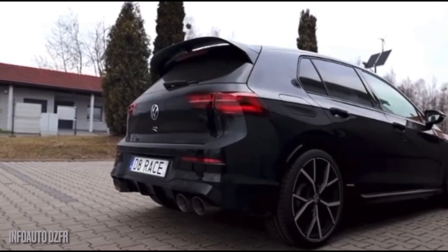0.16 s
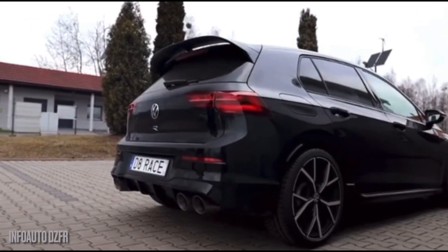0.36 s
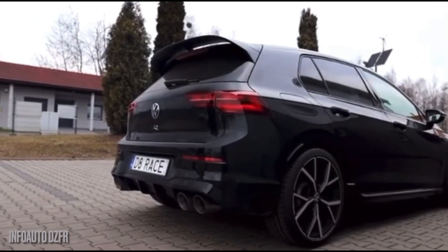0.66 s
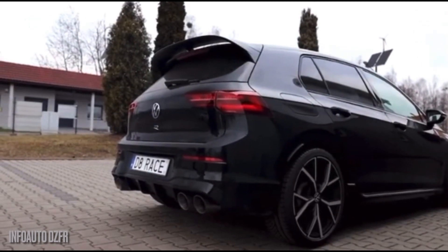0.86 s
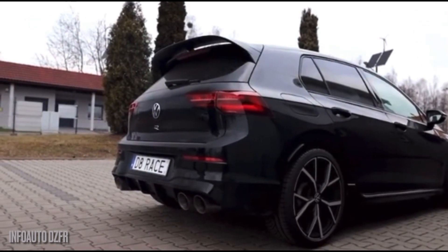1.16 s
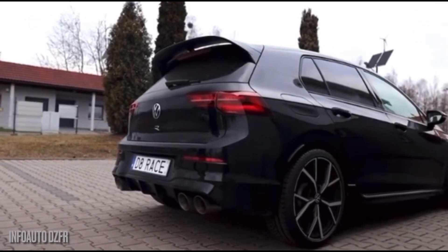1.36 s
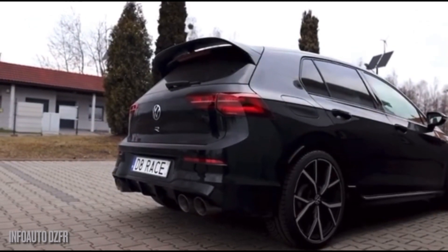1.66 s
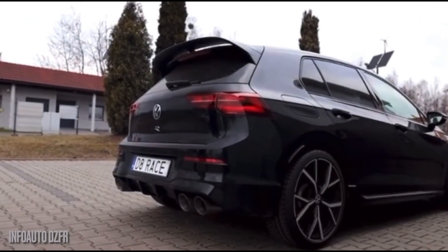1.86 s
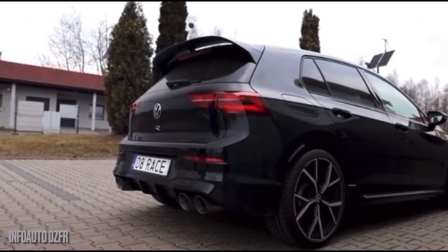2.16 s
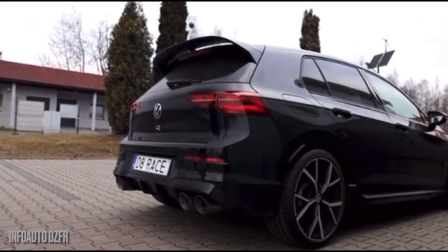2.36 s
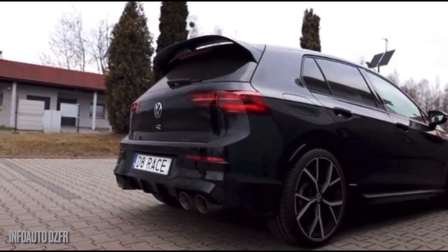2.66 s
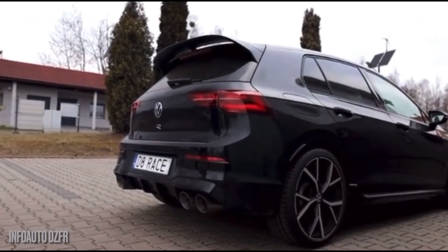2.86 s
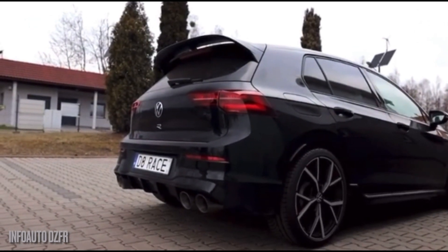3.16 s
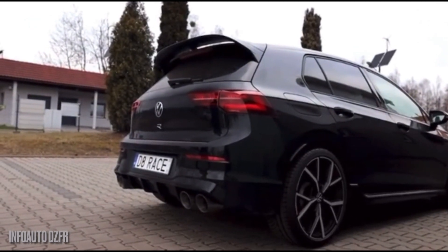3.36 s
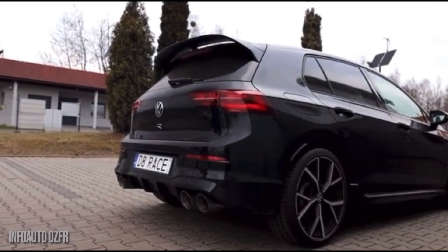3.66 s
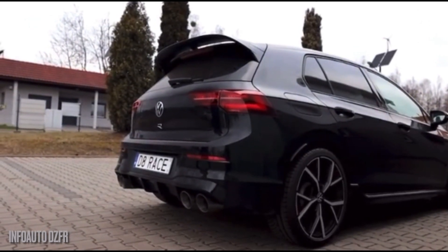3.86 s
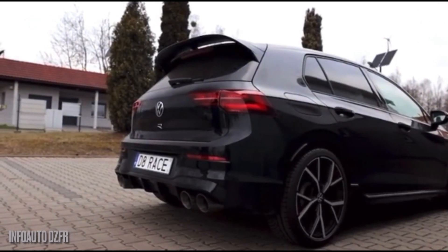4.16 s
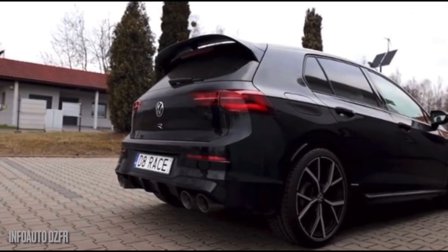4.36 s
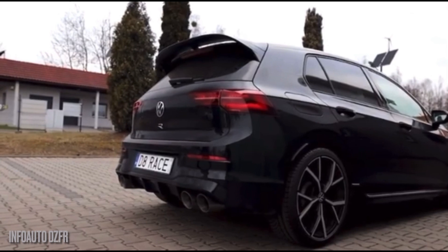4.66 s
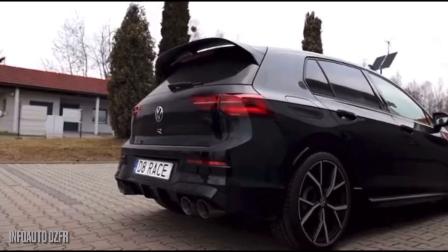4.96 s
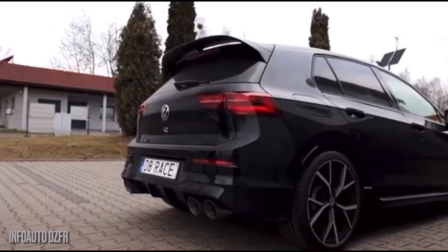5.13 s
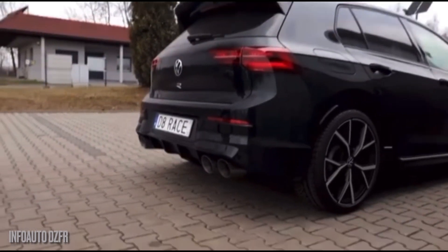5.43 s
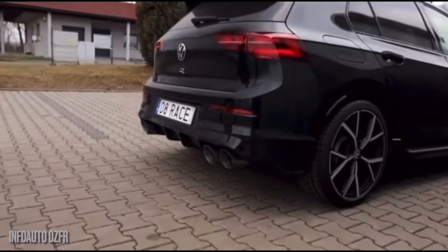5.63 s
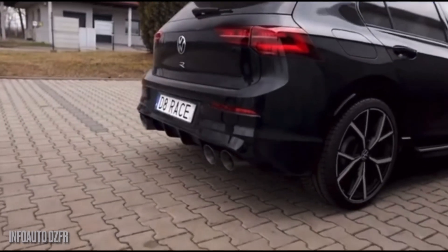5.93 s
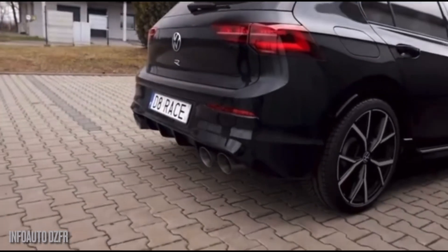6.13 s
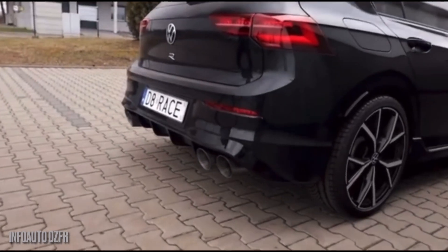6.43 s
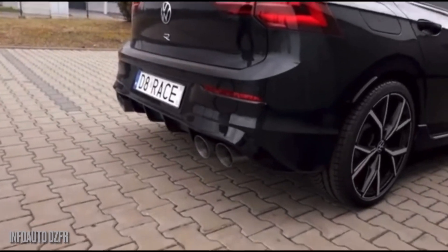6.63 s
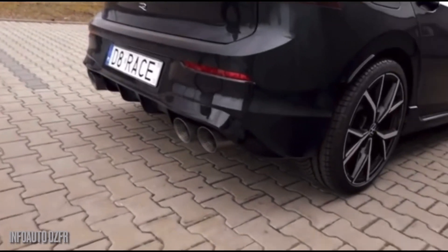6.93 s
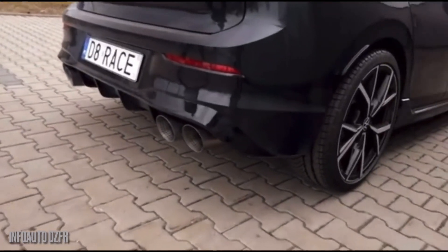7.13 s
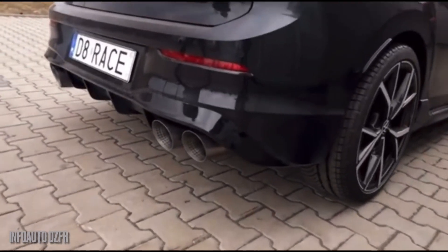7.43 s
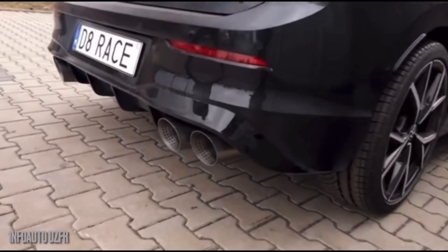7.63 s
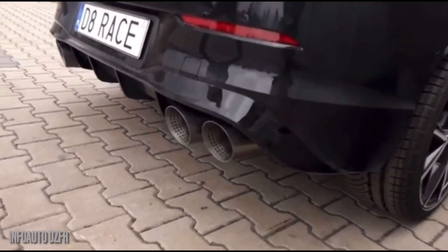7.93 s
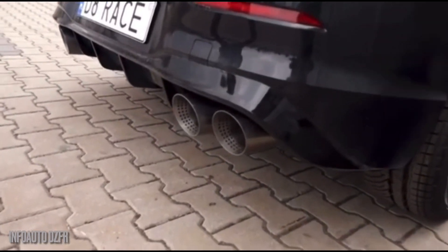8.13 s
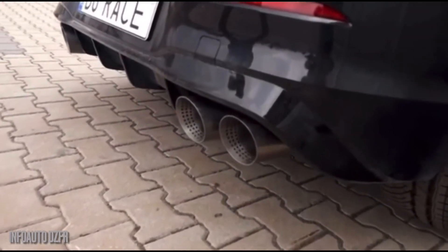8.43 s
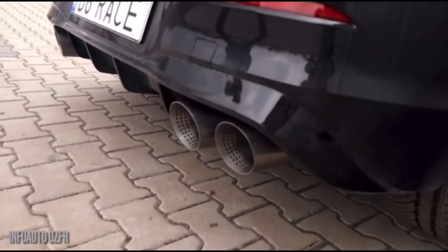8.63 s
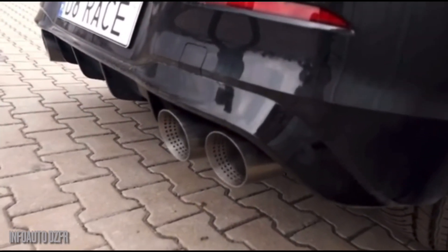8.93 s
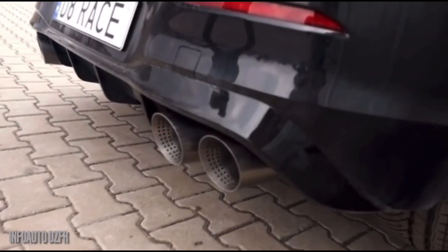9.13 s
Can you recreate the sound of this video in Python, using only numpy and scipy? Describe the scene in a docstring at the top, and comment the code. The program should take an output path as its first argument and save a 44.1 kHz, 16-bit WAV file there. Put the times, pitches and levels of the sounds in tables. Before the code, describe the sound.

A stationary four-cylinder car is revved in short blips on a paved yard, heard from behind. The exhaust drones and rasps continuously; after each lift come irregular bangs, crackles and a lumpy burning rumble while the note sags. Faint open-air background and little echo. From about five seconds the microphone moves toward the tailpipes, bringing out a harder bark and breathy rasp.

```python
"""A parked turbocharged four-cylinder car is blipped again and again, heard from behind on a paved yard.
Firing pulses drone and rasp through the silencer from the start, over a soft background of shaped noise.
Mostly after the lifts, fuel explodes in the hot pipe: volleys of shock waves, thumps and short rings,
over a lumpy rumble and sputter of burning fuel. The hardest bangs overload the microphone.
It moves up to the tailpipes near the end, which brings out the bark and the pipe mouth."""
import sys
import numpy as np
from scipy import signal
from scipy.fft import rfft, irfft
from scipy.io import wavfile
from scipy.ndimage import uniform_filter1d

SR = 44100
rng = np.random.default_rng(int(sys.argv[2]) if len(sys.argv) > 2 else 0)


def store_wav(level_fs):
    """Save 16-bit WAV to argv[1]."""
    pcm = np.round(np.clip(np.atleast_2d(level_fs), -1, 1) * 32767)
    wavfile.write(sys.argv[1], SR, pcm.T.astype(np.int16))


N = 409688
T = np.arange(N) / SR

# throttle blips: (pressed [s], lifted [s], top of the rev [s], firing rate from [Hz], to [Hz],
# effort [dB], extra bark and rasp [dB], coasting afterwards [dB])
BLIPS = [(-.25, 0.043, .08, 126.8, 183.6, 3.5, -0.5, -1),
         (1.185, 1.326, 1.42, 133.4, 153.3, 0.5, 0.5, -3.5), (2.325, 2.491, 2.48, 114, 137.9, -1, 0.5, 0.5),
         (2.81, 3.19, 3.215, 126.2, 191.8, 1.8, -1, -2), (4.245, 4.43, 4.4, 141.8, 162, 0, -1, -1.5),
         (5.54, 5.688, 5.74, 116, 135.1, 2.5, 1, 2.5), (6.825, 7.32, 7.2, 91.07, 187.6, 2, 0, 1),
         (8.372, 8.52, 8.54, 140.5, 160.7, 0, 0, 0)]
# microphone's approach: (time [s], closeness to the tailpipes [0-1])
APPROACH_PATH = [(5.3, 0), (6.8, 0), (8.2, 0.99)]
# loud explosions in the exhaust, relative levels:
# (time [s], shock [dB], thump [dB], crack: treble over thump [dB])
LOUD_POPS = [(0.0148, -8, -14.5, -23), (0.1291, -12, -14.5, -31), (0.175, -6.5, -21, -17),
             (0.1983, -7, -31, -20), (0.2326, -14, -17.5, -22), (0.2562, -9, -17.5, -17),
             (0.286, -8.5, -16.5, -12), (0.3178, -8, -20, -14), (0.413, -6.5, -14.5, -9.5),
             (0.5125, -5, -12, -5.5), (0.6171, -4, -15, -2), (0.6554, -17, -18.5, -16),
             (1.4359, -18, -17.5, -32), (1.477, -7, -14, -18.5), (1.5895, -10.5, -12, -25),
             (1.6281, -5.5, -16, -5), (1.6512, -14, -18, -17), (1.6636, -10, -18.5, -13.5),
             (1.7592, -2, -15, 0), (1.781, -12.5, -18.5, -21), (1.9219, -4.5, -17.5, -5.5),
             (2.0587, -23.5, -25.5, -32), (2.572, -19.5, -20, -32), (2.6812, -4, -19.5, -7.5),
             (3.277, -13.5, -16.5, -30), (3.3061, -9.5, -13.5, -21.5), (3.3652, -6.5, -15.5, -7.5),
             (3.3761, -7.5, -23, -13.5), (3.4437, -9, -14, -14), (3.5665, -8, -16, -9.5),
             (3.6018, -8, -18, -12.5), (3.6185, -12, -17, -17), (3.7178, -8.5, -14.5, -10.5),
             (3.7366, -13.5, -25, -11), (4.5081, -18, -19.5, -32), (4.56, -7, -13, -24.5),
             (4.6562, -6.5, -13, -13), (4.6966, -5.5, -20, -7), (4.7097, -9, -20, -11),
             (4.7841, -4.5, -19.5, -4), (4.8448, -5.5, -17, -4.5), (4.866, -10, -28, -11.5),
             (4.9718, -5, -14.5, -7), (5.0727, -5.5, -14, -19), (5.0794, -7, -13.5, -9.5),
             (5.1495, -15, -18.5, -24), (5.7706, -17, -17, -25), (5.7876, -7, -14.5, -32),
             (5.9678, -2.5, -14.5, -9), (6.0658, -1.5, -18, -4.5), (6.2375, -0.5, -18, -5.5),
             (6.3717, -2.5, -22, -13.5), (7.2864, -9, -33, -11.5), (7.4233, -8.5, -16, -32),
             (7.4407, -8.5, -14, -33), (7.4581, -8.5, -17.5, -22), (7.4917, -3, -24, -11),
             (7.5018, -5, -24, -12.5), (7.5208, -10.5, -32, -12.5), (7.5685, -9, -21, -12),
             (7.5807, -5, -20, -15), (7.5995, -14, -25, -24), (7.648, -4, -19, -14),
             (7.6845, -5.5, -17.5, -12), (7.7195, -9, -24, -20.5), (7.774, -5, -17.5, -11),
             (7.8397, -5, -17.5, -6), (7.8449, -7, -16, -11.5), (7.884, -11, -30, -25),
             (7.9136, -5, -13.5, -9.5), (8.3864, -14.5, -28, -36)]
# fuel smouldering in the pipe: (from [s], to [s], rumble [dB], sputter [dB])
BURN_SPANS = [(0.086, 0.373, -29.5, -37), (1.36, 1.67, -29, -42), (2.554, 2.817, -29.5, -45.5),
              (3.26, 3.792, -31, -44.5), (4.49, 4.721, -30.5, -41), (5.747, 5.838, -25.5, -41.5),
              (7.38, 7.945, -33, -39.5), (8.593, 8.702, -33.5, -67.5)]
# ring of the pipes: (frequency [Hz], level [dB])
RING_COLOUR = [(200, -1.5), (560, 0), (750, -0.5), (1100, -11.5), (1350, -13.5), (1530, -10.5), (1750, 8.5),
               (2080, -4.5), (2260, -3), (2700, -14.5), (3300, -5.5), (4400, -15), (4900, -15),
               (6500, -13.5), (8400, -11.5)]


def undb(db):
    """Decibels to amplitude ratio."""
    return 10 ** (np.asarray(db) / 20)


def unit(x):
    """Scale to rms 1."""
    return x / np.sqrt(np.mean(x ** 2) + 1e-18)


def curves(table):
    """Columns of a table, joined by straight lines in time."""
    time_s, *columns = np.transpose(table)
    return [np.interp(T, time_s, column) for column in columns]


def noise():
    """White noise over the whole scene."""
    return rng.standard_normal(N)


def walk(rate_hz):
    """Slow random drift of rms 1."""
    hold = max(int(SR / rate_hz), 2)
    steps = np.repeat(rng.standard_normal(N // hold + 1), hold)
    return unit(uniform_filter1d(steps, hold)[:N])


def colour(x, points, size=4096):
    """Causal minimum-phase filter with the given (frequency [Hz], level [dB]) response."""
    hz, db = np.transpose(points)
    f = np.maximum(np.arange(size // 2 + 1) * SR / size, 1)
    log_gain = np.log(undb(np.interp(np.log(f), np.log(hz), db)))
    cepstrum = irfft(log_gain)[:size // 2]
    cepstrum[1:] *= 2
    impulse = irfft(np.exp(rfft(cepstrum, size)))
    return signal.fftconvolve(x, impulse)[:len(x)]


def edge(x, hz, kind, order=2):
    """Butterworth low-pass or high-pass."""
    return signal.sosfilt(signal.butter(order, min(hz, .45 * SR), kind, fs=SR, output="sos"), x)


def steady(x, size=2500):
    """Hold the short-term rms at 1."""
    return x / np.sqrt(np.maximum(uniform_filter1d(x ** 2, size), 0) + 1e-12)


def burning_span(on_s, off_s):
    """1 while fuel smoulders, else 0."""
    return 1. * ((T > on_s) & (T < off_s))


def firing_rate():
    """Firing rate [Hz] climbs evenly on the throttle and runs down evenly between blips."""
    coast_hz_per_s = 43  # friction slows the engine after the last blip
    points = []
    for on_s, _, top_s, low_hz, top_hz, *_ in BLIPS:
        points += [(on_s, low_hz), (top_s, top_hz)]
    last_s, last_hz = points[-1]
    end_hz = last_hz - coast_hz_per_s * (T[-1] - last_s)
    return curves(points + [(T[-1], end_hz)])[0]


def throttle():
    """Load 0-1 (open, hold, close), effort [dB] on and off the throttle, extra bite [dB] of each blip."""
    open_s, close_s = 0.017, 0.096
    boost_lag_db, boost_s = -2.5, 0.062  # boost builds after each press: a blip starts soft and swells
    sag_db, sag_s = -4.5, 0.13  # the note sags just before each blip catches
    load, effort_db, bite_db, coast_db = np.zeros((4, N))
    for on_s, off_s, _, _, _, push_db, extra_db, after_db in BLIPS:
        opening = np.clip((T - on_s) / open_s, 0, 1)
        closing = np.clip(1 - (T - off_s) / close_s, 0, 1)
        press = opening * closing
        boost_db = boost_lag_db * np.exp(-np.maximum(T - on_s, 0) / boost_s)
        load += press
        effort_db += press * (push_db + boost_db)
        bite_db += press * extra_db
        coast_db += sag_db * np.exp(-np.abs(T - on_s) / sag_s)
        coast_db[T > on_s + open_s] = after_db
    return load, effort_db + (1 - load) * coast_db, bite_db


def note_dip():
    """The engine note dips after each sharp bang: 1 at the bang, falling to 0 as the note recovers."""
    recover_s, min_crack_db = 0.23, -14.5
    sharp_s = sorted(s for s, _, _, crack_db in LOUD_POPS if crack_db > min_crack_db)
    bangs_s = np.array([-recover_s] + sharp_s)
    since_s = T - bangs_s[np.searchsorted(bangs_s, T, side="right") - 1]
    return np.clip(1 - since_s / recover_s, 0, 1)


def voice_levels(hz, load, effort_db, bite_db, near):
    """Each voice [dB] follows load, speed and closeness; pipe resonances show most when coasting."""
    # exhaust voices before mix trims: name: (coasting [dB], gain under load [dB],
    # per octave of speed [dB], gain close by [dB], share of the pipe resonance [0-1])
    voices = {"tone": (-30.5, -2, -3, 3, 1), "octave": (-37, 8, -1.5, -4.5, 0),
              "boom": (-30.5, 4.5, 2.5, -4.5, 0.82), "bark": (-42.5, 8.5, 8.5, 3, 0.83),
              "rasp": (-43, 13, 7.5, 1.4, 0.63)}
    # standing waves lift the firing tone: (firing rate [Hz], gain [dB])
    pipe = [(90, -1), (105, -10), (116, 0), (126, -3), (136, 0), (149, 5.5), (162, -1.5), (188, 3)]
    # standing waves at the octave: (twice the firing rate [Hz], gain [dB])
    pipe_octave = [(185, -5), (210, -23.5), (240, -5.5), (278, 2.5), (293, 8), (325, 5), (365, 9)]
    # bark is beamed along the tailpipes, the microphone moves into the beam: (time [s], gain [dB])
    beam = [(5.3, -1), (5.7, 3.5), (6.45, 2), (6.85, 9.5), (8.9, 6), (9.29, 6.5)]
    cruise_hz, full_dip_db = 150, -7
    # smouldering fuel feeds the main standing wave when the firing rate meets it
    flame_hz, flame_width_hz, full_flame_db = 147, 3.8, 5

    octaves = np.log2(hz / cruise_hz)
    pipe_db = np.interp(hz, *np.transpose(pipe)) * (1 - load)
    tone, octave, boom, bark, rasp = (
        rest_db + effort_db + load_db * load + speed_db * octaves + near_db * near + share * pipe_db
        for rest_db, load_db, speed_db, near_db, share in voices.values())
    dip_db = full_dip_db * note_dip() * (1 - load) * (1 - .4 * near)
    burning = uniform_filter1d(sum(burning_span(on_s, off_s) for on_s, off_s, _, _ in BURN_SPANS), size=4000)
    match = np.exp(-((hz - flame_hz) / flame_width_hz) ** 2)
    flame_db = full_flame_db * burning * match * (1 - near)
    octave_db = np.interp(2 * hz, *np.transpose(pipe_octave))
    beam_db, = curves(beam)
    return (tone + dip_db + flame_db,
            octave + octave_db + 0.87 * dip_db,
            boom + 0.7 * dip_db - 0.13 * beam_db,
            bark + beam_db + bite_db,
            rasp + bite_db + .2 * dip_db)


def firings(phase, hz, scatter_db, jitter_ms):
    """One suction pulse per firing, less its two lowest orders; unequal cylinders add half and quarter orders."""
    # cylinders in firing order: (strength [dB], lag along its exhaust runner [ms])
    cylinders = [(2, 0), (-3.5, 0.067), (3, -0.032), (-2, 0.068)]
    count = np.arange(int(phase[-1]))
    chance = rng.standard_normal((len(count), 2)).T
    cylinder_db, lag_ms = np.array(cylinders)[count % len(cylinders)].T
    late = (lag_ms + chance[0] * jitter_ms) * SR / 1000
    at = np.clip(np.interp(count, phase, np.arange(N)) + late, 0, N - 2)
    i = at.astype(int)
    size = undb(cylinder_db + chance[1] * scatter_db[i])
    # each pulse is split between two samples
    pulses = np.bincount(i, size * (1 - at + i), N) + np.bincount(i + 1, size * (at - i), N)
    turn = 2 * np.pi * phase
    low_orders = 2 * size.mean() * hz / SR * (np.cos(turn) + np.cos(2 * turn))
    return unit(low_orders - pulses)


def rattle(x, decay_ms, size=1200):
    """Many reflections in the silencer and under the body smear each pulse but keep its harmonics."""
    reflections = rng.standard_normal(size) * np.exp(-1000 * np.arange(size) / SR / decay_ms)
    return unit(signal.fftconvolve(x, reflections)[:N])


def engine():
    """Firing pulses hum in the pipe, boom in the silencer and rasp at its mouth, with a puff of gas each."""
    # voice colours: (frequency [Hz], level [dB])
    boom_colour = [(150, -42), (250, -10.5), (340, 1), (400, 6), (470, 2.5), (530, -8.5), (600, -12.5),
                   (700, -28.5), (1100, -58)]
    bark_colour = [(420, -24.5), (520, -13.5), (590, 7.5), (680, 3), (770, 6), (930, 0), (1100, -14),
                   (1600, -68.5)]
    rasp_colour = [(600, -34), (1150, -6), (1290, 6.5), (1400, 7.5), (1550, -8), (1720, 3.5), (1900, 2),
                   (2050, -18.5), (2300, -8.5), (2700, -21), (3300, -12), (4200, -33), (5000, -37),
                   (9000, -57.5)]
    mouth_colour = [(700, -25), (1020, 10.5), (1250, 0.5), (1600, 7), (2100, 1), (2700, -8), (3700, -18.5),
                    (4500, -29.5), (7000, -46)]  # straight off the pipe mouth
    brass_colour = [(1500, -29.5), (2250, -8.5), (2650, -15), (3200, 12), (3750, 1.5), (4400, -15),
                    (5000, -13.5), (6500, -21.5), (9000, -31)]  # steepened pulses
    hiss_colour = [(1500, 8), (2800, 7.5), (3600, -2), (4400, -5), (5100, -3), (6300, -9.5), (7600, -8.5),
                   (8500, -5.5), (10000, -20.5)]  # rushing gas

    hz = firing_rate()
    near, = curves(APPROACH_PATH)
    load, effort_db, bite_db = throttle()
    tone_db, octave_db, boom_db, bark_db, rasp_db = voice_levels(hz, load, effort_db, bite_db, near)
    phase = np.cumsum(hz * (1 + 0.002086 * walk(35))) / SR  # in firings
    turn = 2 * np.pi * phase
    tone = undb(tone_db + 1.2 * walk(40)) * np.cos(turn)
    octave = undb(octave_db + 1.2 * walk(55)) * np.cos(2 * turn)
    drone = -np.sqrt(2) * (tone + octave)

    # under load combustion is rougher and the gas more turbulent
    pulses = firings(phase, hz, scatter_db=1.64 + 0.23 * load, jitter_ms=0.033)
    puffs = unit(noise() * (.4 + np.exp(-(phase % 1) / .3)))
    gas = puffs * (1 + .3 * load) * (1 - .3 * near)
    jet = rattle(pulses, decay_ms=5.0) + .75 * gas
    turbulence = .35 + .35 * load + .4 * load * near

    boom = steady(colour(pulses + 0.34 * gas, boom_colour)) * undb(boom_db - 0.2)
    bark = steady(colour(pulses + turbulence * gas, bark_colour)) * undb(bark_db + 0.33)
    rasp = steady(colour(jet + pulses, rasp_colour)) * undb(rasp_db + 0.4 - 2 * near)
    # only heard from close by
    mouth = steady(colour(jet, mouth_colour)) * undb(rasp_db - 7.5 + 1.8 * load) * near
    # the strongest pulses steepen on their way out and gain a brassy edge
    brass_db = 1.8 * (rasp_db + 25.5) - 38.5 + 3.3 * load
    brass = steady(colour(jet, brass_colour)) * undb(brass_db)
    hiss = unit(colour(puffs, hiss_colour)) * undb(rasp_db - 15.5 + load - 27 * near ** 6)
    return undb(1.0) * drone + boom + bark + rasp + mouth + brass + hiss


def yard(car, size=22050):
    """Faint scatter from walls and trees over a soft background; the two ears differ only in the treble."""
    # engine bay and open air: (frequency [Hz], level [dB])
    air_colour = [(25, -18), (70, 1), (200, -3), (400, 7), (1000, -9.5), (2000, -13), (4300, -22.5),
                  (5200, -23), (6500, -29), (8300, -24), (10000, -44.5)]
    t = np.arange(size) / SR
    near, = curves(APPROACH_PATH)
    tails = rng.standard_normal((2, size)) * np.exp(-t / 0.024) * (t > .012)
    mid, side = (signal.fftconvolve(car, tail / np.linalg.norm(tail))[:N] for tail in tails)
    air = unit(colour(noise(), air_colour)) * undb(-42.5 + 0.43 * walk(5) - 4.4 * near)
    # the paving sends a quick reflection in from one side
    glance = np.concatenate([np.zeros(int(0.0017 * SR)), car])[:N]
    side = undb(-25.5) * glance + undb(-38.0) * side + undb(-60) * noise()
    side = edge(side, 5400, "high", order=4)
    return undb(-19.0) * mid + air + np.array([side, -side])


def explosions():
    """Rows like LOUD_POPS: the loud bangs, then soft pops at random while fuel smoulders."""
    soft_pops_per_s, soft_db, soft_spread_db, soft_crack_db = 7, -23, 1.5, -28
    rows = list(LOUD_POPS)
    for on_s, off_s, _, _ in BURN_SPANS:
        for k, (late, size, bright) in enumerate(rng.uniform(-1, 1, size=(16, 3))):
            s = on_s + (k + .5 + late / 2) / soft_pops_per_s
            if s < off_s:
                db = soft_db + soft_spread_db * size
                rows.append((s, db, db - 5, soft_crack_db + 6 * bright))
    return rows


def shock(t, shock_db, crack_db):
    """One blast leaves by several paths as suction spikes; a sharp one has steep fronts, a big one lasts longer."""
    # paths out of the pipes and off the paving, before stretch: (delay [ms], level [dB])
    paths = [(0, 2), (.6, -6), (1.65, -15), (2.25, 1), (2.85, -4), (7.1, -24), (10.4, -10)]
    delay_ms, path_db = np.transpose(paths)
    chance = rng.standard_normal((len(paths), 2)).T
    stretch = 1 + 0.098 * max(shock_db + 4.5, 0)
    width_ms = stretch * np.clip(0.069 * undb(-.8 * (crack_db + 2.5)), .04, .2)
    arrival_ms = stretch * delay_ms * (1 + 0.017 * chance[0])
    age = np.maximum(1000 * t[:, None] - arrival_ms, 0) / width_ms
    spikes = (age * np.exp(1 - age)) ** 2 @ undb(path_db + 0.89 * chance[1])
    return -edge(edge(spikes, 282, "high"), 4400 * undb(0.62 * (crack_db + 18.0)), "low")


def pops(size=6000):
    """Each explosion is a volley of shocks, a thump in the silencer and a short ring of the pipes."""
    # silencer thump: (frequency [Hz], level [dB])
    thump_colour = [(25, -31.5), (70, -19.5), (140, -7), (210, -13), (300, -2), (420, 7), (570, 1.5),
                    (700, -35.5), (1100, -39), (3000, -56.5)]
    t = np.arange(size) / SR
    out = np.zeros(N + size)
    for s, shock_db, thump_db, crack_db in explosions():
        crack_db = np.clip(crack_db, -32, 0)
        gas = rng.standard_normal((2, size))
        surge = -np.exp(-t / 0.00046) + 0.36 * gas[0] * np.exp(-t / 0.013)
        thump = unit(colour(surge, thump_colour)) * undb(thump_db - 12.0)
        ring_decay = np.exp(-t / 0.0051) + 0.18 * np.exp(-t / 0.01)
        ring = unit(colour(gas[1] * ring_decay, RING_COLOUR))
        # gas temperature shifts each ring a little; soft pops ring dull
        ring = np.interp(t * rng.uniform(.95, 1.05), t, ring, right=0)
        ring = edge(ring, 6000 * undb(0.75 * (crack_db + 6)), "low") * undb(shock_db - 23)
        volley = shock(t, shock_db, crack_db) * undb(shock_db + 4.5)
        i = max(int((s + 0.00059) * SR), 0)
        out[i:i + size] += volley + thump + ring
    return out[:N]


def afterburn():
    """Unburnt fuel flares unevenly in the hot pipe: a low, lumpy rumble and a sputter of tiny pops."""
    # flame rumble: (frequency [Hz], level [dB])
    rumble_colour = [(25, -18), (70, -1.5), (130, -4), (210, -7), (300, 8.5), (430, 2), (580, 1),
                     (750, -23), (1500, -42.5)]
    sparks_per_s = 130
    spans = np.array([uniform_filter1d(burning_span(on_s, off_s), size=700)
                      for on_s, off_s, _, _ in BURN_SPANS])
    flame, sputter = undb(np.array(BURN_SPANS)[:, 2:]).T @ spans
    rumble = unit(colour(noise() * undb(4.2 * walk(70)), rumble_colour))
    sparks = (rng.random(N) < sparks_per_s / SR) * undb(4 * np.clip(noise(), -2, 2))
    crackle = unit(edge(colour(sparks, RING_COLOUR), 2300, "low"))
    return rumble * flame - crackle * sputter


def scene():
    """The car's exhaust, and the yard around it."""
    car = engine() + afterburn() + pops()
    return car + yard(car)


def record(dry):
    """The microphone rounds off the hardest shocks; the top is cut."""
    ceiling, top_hz = .82, 9650
    rounded = dry / (1 + (dry / ceiling) ** 4) ** (1 / 4)
    return signal.sosfilt(signal.ellip(10, .2, 75, top_hz, fs=SR, output="sos"), rounded)


dry = scene()
out = record(dry)
store_wav(out)
```